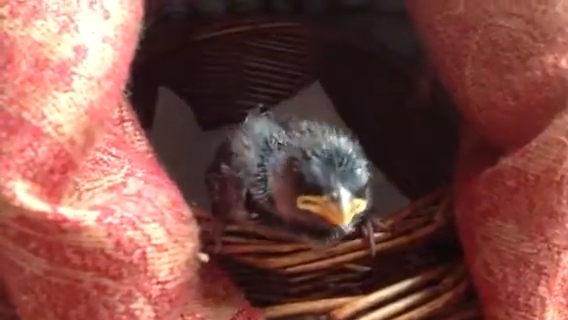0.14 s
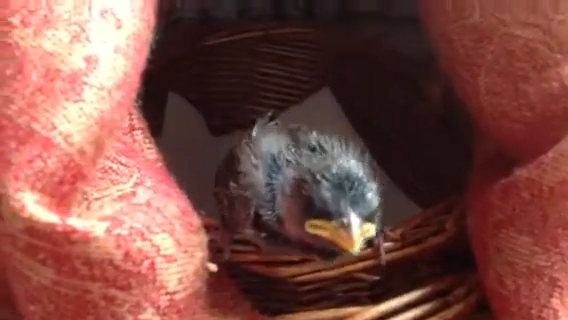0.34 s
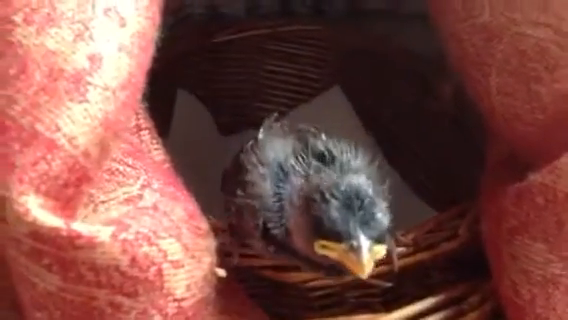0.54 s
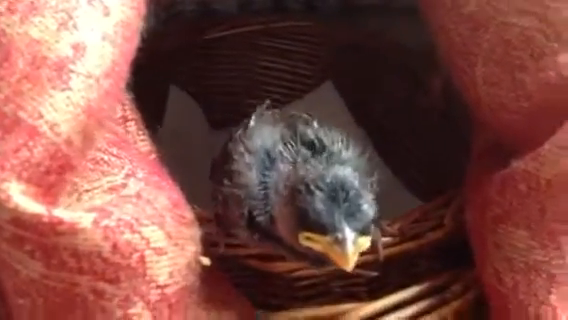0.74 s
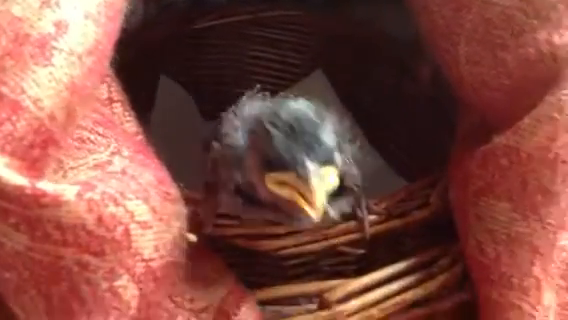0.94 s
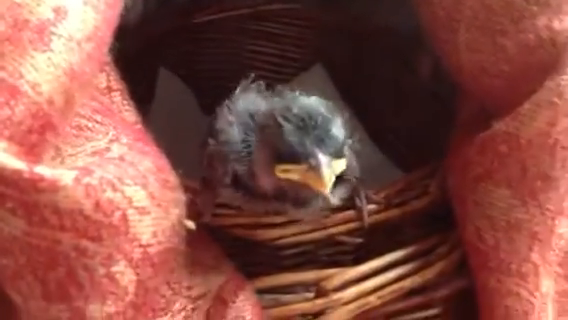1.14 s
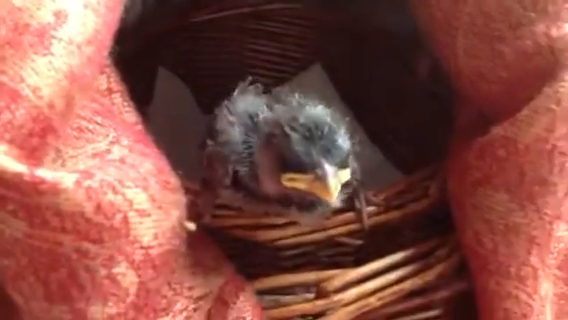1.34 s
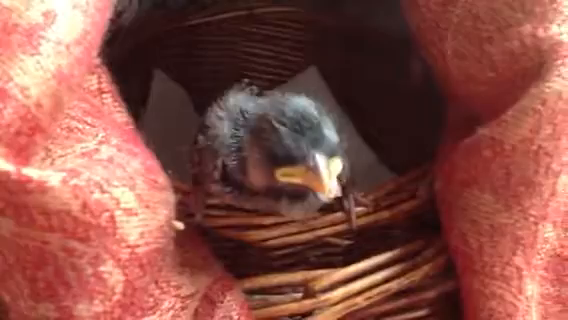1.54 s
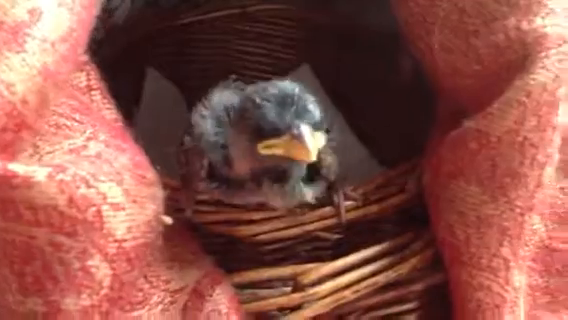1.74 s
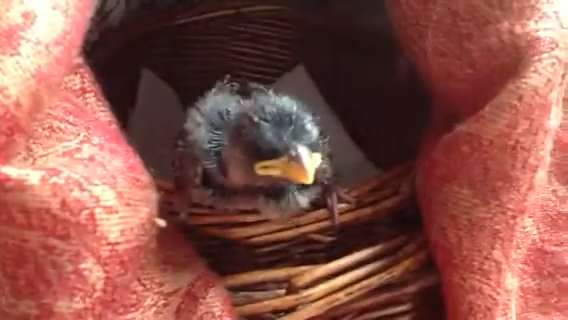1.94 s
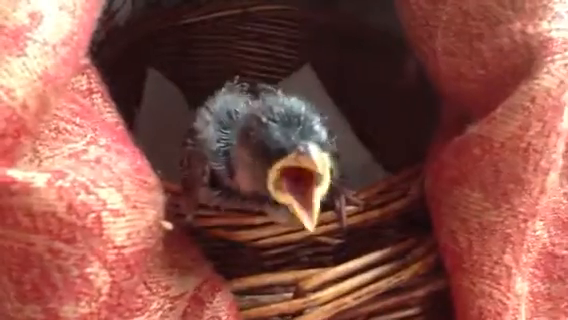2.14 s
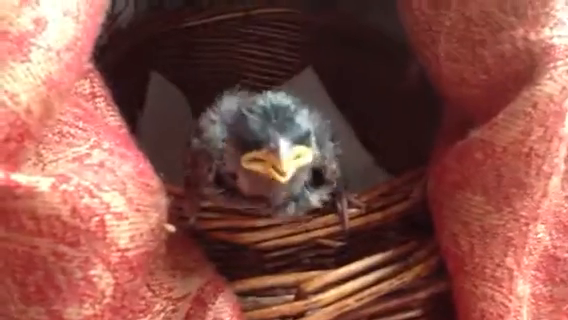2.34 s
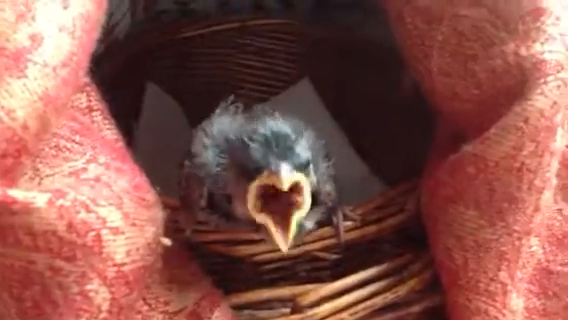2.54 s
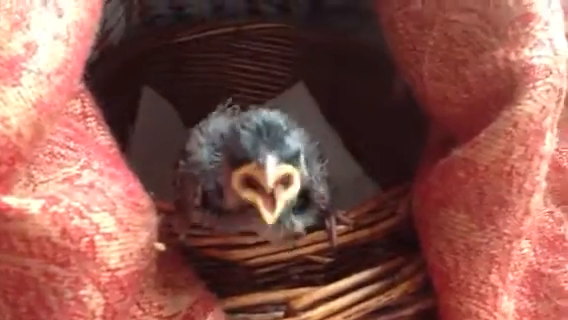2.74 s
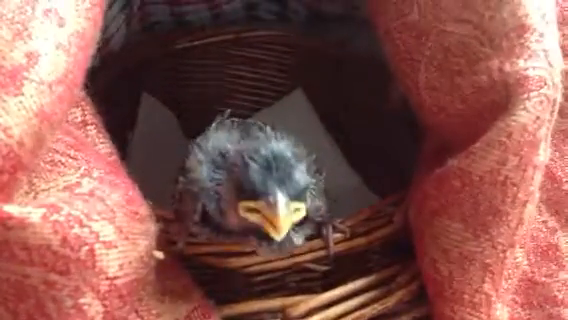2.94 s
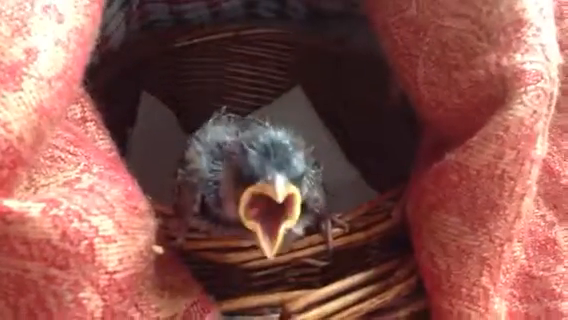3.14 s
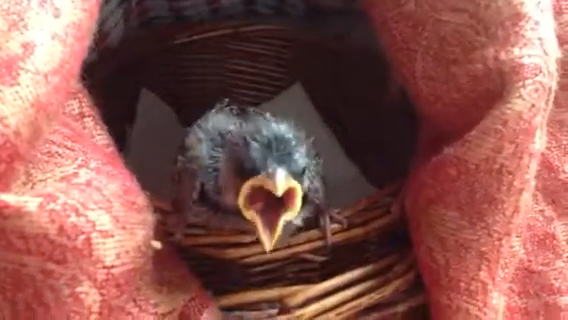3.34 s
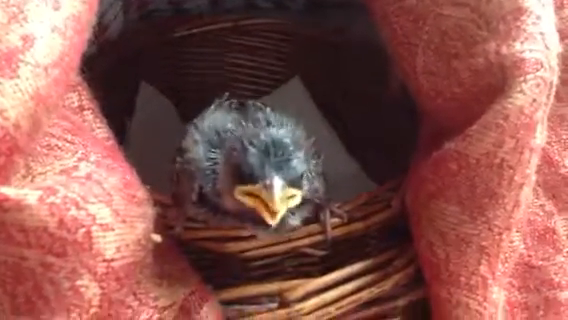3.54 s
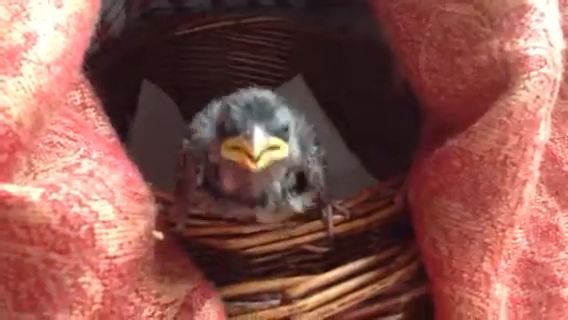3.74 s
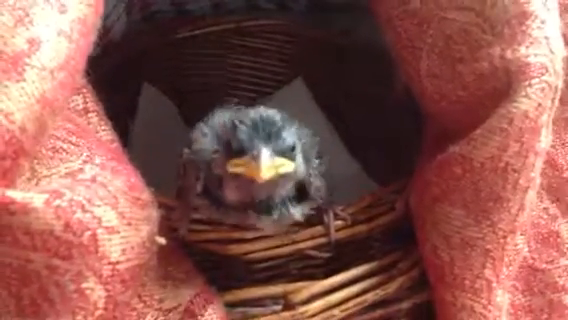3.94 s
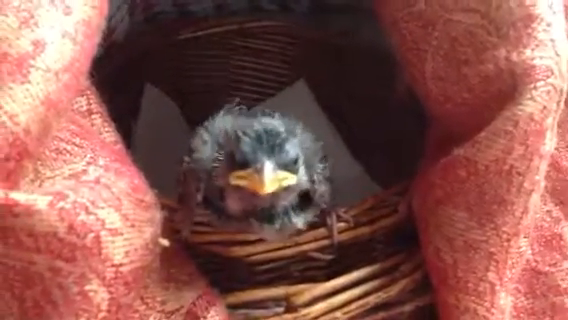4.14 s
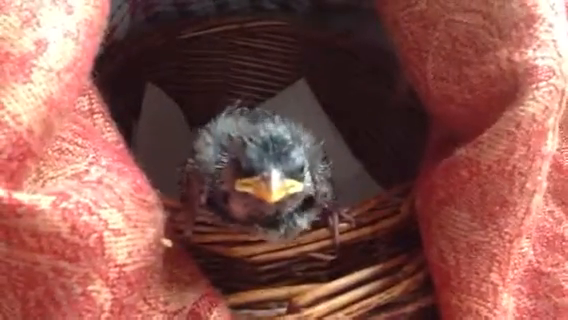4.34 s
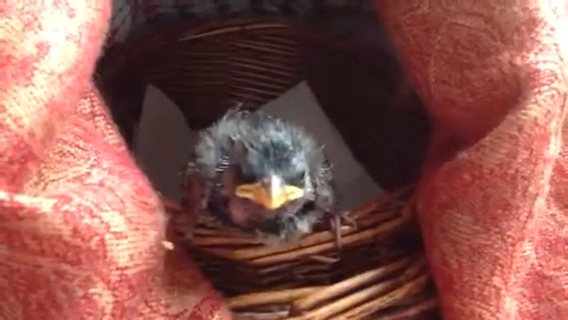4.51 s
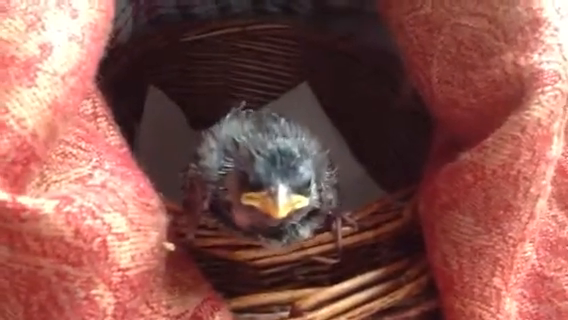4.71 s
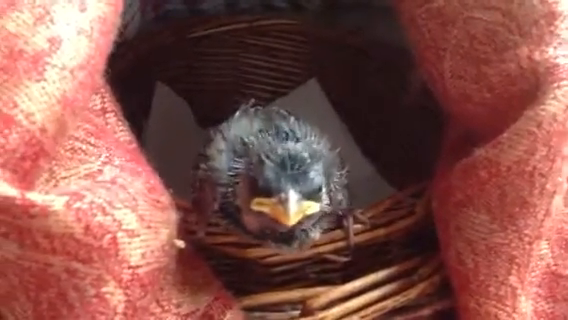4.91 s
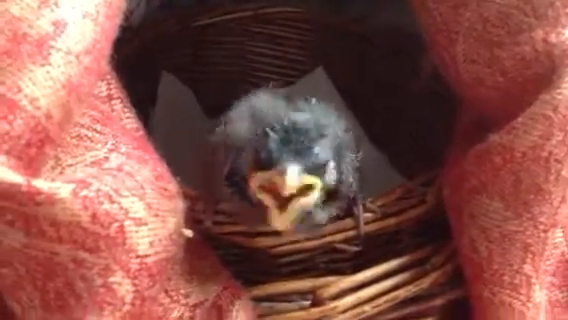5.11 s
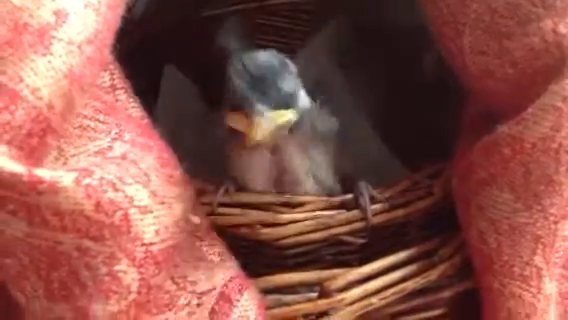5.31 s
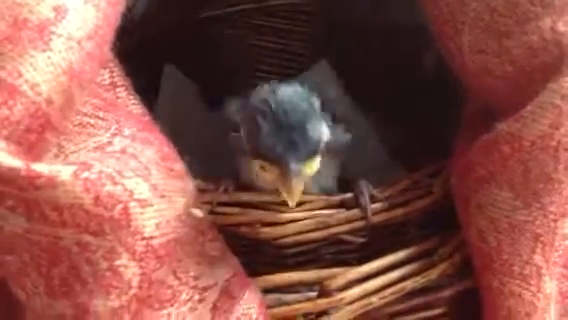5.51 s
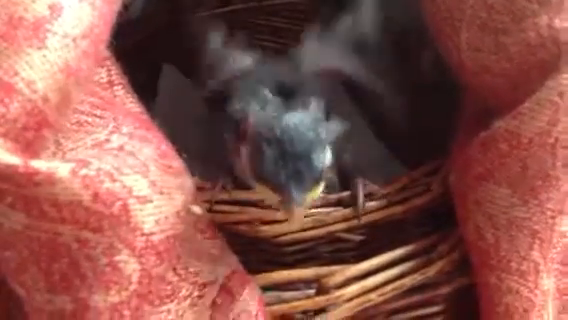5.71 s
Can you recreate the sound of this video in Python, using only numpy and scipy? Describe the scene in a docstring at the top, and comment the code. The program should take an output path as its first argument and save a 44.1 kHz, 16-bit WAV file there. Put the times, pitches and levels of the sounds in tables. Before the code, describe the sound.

A baby bird in a cloth-lined wicker basket begs close to the microphone with four piercing double chirps, roughly every one and a half seconds. Each begins as a rasp, rises to a clear whistle, dips and peaks again. Between them come tiny wicker ticks, dull soft knocks, and faint echoing chirps and thin whistles of birds far away. The small room adds a short tail and steady quiet hiss.

```python
"""Sparrow nestling begging in a basket

Close to the microphone, a nestling in a cloth-lined wicker basket begs with four double chirps.
Its voice flips between a clean whistle of a few partials and a chaotic rasp of uneven cycles and breath.
Far off, other birds give rough gliding chirps and thin whistles with reverberation.
The wicker ticks and dull knocks sound as dying noise bursts; cloth and walls return a short tail; the room hisses."""
import sys
import numpy as np
from scipy import signal
from scipy.fft import rfft, irfft
from scipy.io import wavfile

SR = 44100
rng = np.random.default_rng(int(sys.argv[2]) if len(sys.argv) > 2 else 0)


def bounce(signal):
    """Save signal as a 16-bit WAV file at the path given by the first command-line argument."""
    frames = np.transpose(np.atleast_2d(signal))
    limited = np.clip(frames, -1, 1)
    pcm = np.round(limited * 32767).astype(np.int16)
    wavfile.write(sys.argv[1], SR, pcm)


N = 258867  # length in samples

# The four chirps close to the microphone. Each row: start, held note begins, held note ends,
# second note tops, all in seconds.
CHIRP_TIMES = [(.9005, .993, 1.026, 1.130), (2.1855, 2.274, 2.297, 2.404), (3.690, 3.780, 3.815, 3.917),
               (5.402, 5.490, 5.522, 5.627)]
# Their pitches. Each row: step below the held note, held note middle, held note end,
# top of the second note, all in Hz.
CHIRP_PITCHES = [(4300, 5330, 5000, 4500), (4900, 5100, 5250, 4500), (4600, 5230, 5150, 4600),
                 (4550, 5365, 5230, 4500)]
# Their voices, against the shared shape. Each row: run-up whistle in dB, first note in dB, second note in dB,
# rasp in dB, opening rasp in dB, rasp under first note in dB, rasp under second note in dB,
# throat resonance early in the run-up in Hz, run-up treble in dB, treble in dB.
CHIRP_VOICES = [(5.5, 2, 3, 1, -1, -7, -14, 5750, 0, -.5), (-.5, .7, .5, .3, -5, -9, -8, 8300, 9.5, -.5),
                (-4, -.7, -.8, 1.5, 4.5, 7.5, 6, 6000, 0, -2),
                (-7.5, -2.2, -3.5, -1.8, -3, 5, 7.5, 5900, -2.5, 2)]
VOICE_EDGE_HZ = 970


def nestling():
    """A syrinx sounds a regular whistle and a chaotic rasp on one moving pitch."""
    out = np.zeros(N)
    for times, pitches, voice in zip(CHIRP_TIMES, CHIRP_PITCHES, CHIRP_VOICES):
        t, pitch, whistle_db, rasp_db, throat_hz, treble_db = chirp_controls(times, pitches, voice)
        clean = whistle(t, pitch, whistle_db, rasp_db)
        body, treble = rasp(pitch, throat_hz, jitter=0.066, noisy=1.3)
        fade = np.clip((t[-1] - t) / .014, 0, 1)
        add(out, t[0], fade * (clean + amp(rasp_db) * body + amp(treble_db) * treble))
    high_pass = signal.butter(2, VOICE_EDGE_HZ, "high", fs=SR, output="sos")
    return signal.sosfilt(high_pass, out + 1e-18)


# The shape that every chirp follows. Each row: seconds after its start, pitch in Hz, whistle in dB,
# rasp in dB, throat resonance in Hz, level of the rasp's treble in dB.
CHIRP_SHAPE = [(0, 2800, -85, -61, 5600, -79), (.0015, 2880, -74, -36, 5770, -62),
               (.014, 3000, -68, -37.5, 5850, -48), (.027, 3150, -62, -29.5, 5900, -39),
               (.052, 3450, -45, -18.5, 6200, -31), (.071, 4130, -20, -19, 6000, -25),
               (.083, 4550, -14, -24, 5400, -22), (.091, 5255, -10, -32, 4740, -32),
               (.102, 5260, -7.5, -32.5, 4700, -33), (.121, 5160, -8.5, -35, 4800, -32),
               (.135, 4050, -13, -22.5, 5300, -25.5), (.144, 3300, -45, -18, 5300, -33),
               (.179, 2420, -36, -24, 4470, -39.5), (.196, 3000, -25, -20.5, 5250, -35),
               (.210, 3725, -15, -29, 4490, -33), (.226, 4510, -13, -24.5, 4500, -41),
               (.238, 4280, -19, -23, 4350, -32.5), (.252, 3300, -32, -27.5, 4130, -44),
               (.282, 2780, -82, -38, 3500, -57)]
GAPE_KEPT = .55  # share of the gape left as the whistle sets in


def chirp_controls(times, pitches, voice):
    """Stretch the shared shape to one chirp's turning points and bend it to its pitches and voice."""
    at, shape_hz, *levels = np.transpose(CHIRP_SHAPE)
    _, _, _, swell, loud, voiced, step, held, middle, released, *second_half = at
    falling, fallen, trough, rising, climb, top, tipped, _, end = second_half
    t = np.arange(times[0], times[-1] + end - top, 1 / SR)
    u = np.interp(t, [*times, t[-1]], [0, held, released, top, end])  # time on the shape
    whistle_db, rasp_db, throat_hz, treble_db = [np.interp(u, at, level) for level in levels]

    shifts = np.array(pitches) - np.interp([step, middle, released, top], at, shape_hz)
    step_hz, middle_hz, released_hz, top_hz = shifts
    pitch = np.interp(u, at, shape_hz) + np.interp(
        u, [swell, step, held, middle, released, fallen, trough, top, end],
        [0, step_hz, 0, middle_hz, released_hz, 0, 0, top_hz, 0])

    runup_db, first_db, second_db, rough_db, opening_db, *rest = voice
    under_first_db, under_second_db, runup_hz, bright_db, airy_db = rest
    rasp_db = rasp_db + rough_db + np.interp(
        u, [0, swell, loud, step, held, released, falling, rising, climb, top],
        [0, opening_db, 0, 0, under_first_db, under_first_db, 0, 0, under_second_db, 0])
    whistle_db = whistle_db + np.interp(
        u, [step, held, fallen, trough, top, tipped],
        [runup_db, first_db, first_db, second_db, second_db, 0])

    # the beak gapes most early in the run-up, which moves the throat resonance and the treble
    gape = np.interp(u, [0, swell, voiced, held], [0, 1, GAPE_KEPT, 0])
    throat_hz = throat_hz + gape * (runup_hz - np.interp(swell, at, levels[2]))
    return t, pitch, whistle_db, rasp_db, throat_hz, treble_db + airy_db + gape * bright_db


# Moments when the whistle nearly breaks off. Each row: time in seconds, half width in ms.
BREAKS = [(0.988, 0.64), (1.03, 1.05), (1.133, 1), (1.141, 1), (2.29, 0.51), (2.299, 1), (2.402, 1.19),
          (2.41, 0.33), (2.413, 0.33), (2.419, 0.49), (3.802, 0.54), (5.527, 0.33), (5.531, 0.5),
          (5.622, 0.67)]
# Partials of the whistle; half multiples come from strong-weak cycles.
# Each row: multiple of the pitch, level in dB against the whistle.
PARTIALS = [(.5, -32.5), (1, -0.5), (1.5, -38), (2, -24.5), (2.5, -31), (3, -24)]
STRONG_WEAK_HZ, WHISTLE_EDGE_HZ = 4900, 2960  # half multiples sound only above the first


def whistle(t, pitch, whistle_db, rasp_db):
    """Regular syrinx: flickering partials of one pitch, heard through a throat that passes lows poorly."""
    shaken = np.clip(amp(rasp_db - whistle_db), 0, 1)  # a strong rasp unsteadies the whistle
    unsteady = 1 + (.005 + .035 * shaken) * wander(len(t), 500)
    turn = 2 * np.pi * np.cumsum(pitch * unsteady) / SR
    doubled = np.clip((pitch - STRONG_WEAK_HZ) / 200, 0, 1)
    tone = 0
    for k, db in PARTIALS:
        flicker_db = .6 if k == 1 else 3.0
        share = doubled if k % 1 else 1
        level = share * amp(db + flicker_db * wander(len(t), 260))
        tone = tone + level * np.sin(k * turn) * np.sqrt(2)
    for at, ms in BREAKS:
        tone = tone * (1 - .85 * np.exp(-((t - at) * 1000 / ms) ** 2))
    # the clean cycle fades away as the rasp grows from 2 to 8 dB above it
    tone = tone * np.clip((whistle_db - rasp_db + 8) / 6, 0, 1)
    high_pass = signal.butter(7, WHISTLE_EDGE_HZ, "high", fs=SR, output="sos")
    return signal.sosfilt(high_pass, tone * amp(whistle_db))


# Colour of the rasp beside the throat resonance. Each row: frequency in Hz, relative level in dB.
SKIRT = [(300, -55), (1000, -28), (1600, -16.5), (2300, -11.5), (3000, -2.5), (4200, 7), (5500, 4),
         (8000, -21), (16000, -32.5)]
THROAT_WIDTH_HZ, SIDE_DB, TREBLE_EDGE_HZ = 1200, -2.5, 8800
THIN_FROM_HZ, THIN_DB_PER_KHZ = 3200, -3.5  # turbulence thins over the first kilohertz above this pitch


def rasp(pitch, throat_hz, jitter, noisy):
    """Chaotic syrinx: cycles of uneven length and size, heard through the throat; returns body and treble."""
    n = len(pitch)
    chaos = 1 - np.exp(-(np.arange(n) / SR / 0.015) ** 2)  # a thin squeak first, which then breaks up
    uneven = 1 + jitter * (.3 + 0.89 * chaos) * wander(n, 1100)
    turn = 2 * np.pi * np.cumsum(pitch * uneven) / SR
    # the squeak runs at twice the pitch; odd multiples enter as the cycles pair up
    source = 0
    for k in range(1, 7):
        share = chaos if k % 2 else 1
        source = source + np.cos(k * turn) * share * (k * pitch < .45 * SR)
    bursts = amp(3.5 * np.tanh(wander(n, 500)))
    cycles = rms_one(source) * bursts
    breath = chaos * rng.standard_normal(n)
    source = cycles + noisy * breath

    # moving resonance: shift its centre to zero, low-pass, shift back
    centre = np.exp(2j * np.pi * np.cumsum(throat_hz) / SR)
    narrow = signal.butter(2, THROAT_WIDTH_HZ / 2, fs=SR, output="sos")
    peak = (signal.sosfilt(narrow, source / centre) * centre).real

    # turbulence fills in beside the resonance and below the pitch
    skirt = colour(source + 4.04 * bursts * rng.standard_normal(n), SKIRT)
    side_db = SIDE_DB + THIN_DB_PER_KHZ * np.clip((pitch - THIN_FROM_HZ) / 1000, 0, 1)
    body = rms_one(rms_one(peak) + amp(side_db) * chaos * rms_one(skirt))
    high_pass = signal.butter(3, TREBLE_EDGE_HZ, "high", fs=SR, output="sos")
    treble = signal.sosfilt(high_pass, cycles + .75 * breath)
    return body, rms_one(treble)


# What the cloth and walls around the basket send back. Each row: frequency in Hz, relative level in dB.
WALLS = [(1500, -20.5), (2500, 10.5), (3300, 1), (4500, -2.5), (5600, -4.5), (9000, -6.5), (16000, -9)]
ROOM_T60_S, ROOM_DB = .31, -21.5


def room_tail(chick):
    """Cloth and walls colour the voice and scatter it into a diffuse decay."""
    return amp(ROOM_DB) * echoes(colour(chick, WALLS), ROOM_T60_S)


# Ticks of wicker and feathers. Each row: time in seconds, peak in dB.
TICKS = [(.737, -55), (2.154, -52), (2.181, -45), (2.571, -57), (3.156, -54), (3.166, -60), (5.253, -41.5),
         (5.262, -41), (5.304, -50), (5.324, -48), (5.354, -48), (5.360, -50), (5.760, -52)]


def ticks():
    """Wicker and feathers give bright noise bursts that die at once."""
    return contacts(TICKS, hz=8800, t60=.025)


# Dull knocks. Each row: time in seconds, peak in dB.
KNOCKS = [(2.695, -58), (2.711, -51), (4.062, -57), (4.075, -60), (4.084, -59), (5.352, -57), (5.43, -51),
          (5.445, -52)]


def knocks():
    """Dull knocks are lower noise bursts that die a little more slowly."""
    return contacts(KNOCKS, hz=760, t60=.055)


def contacts(rows, hz, t60):
    """Short dying noise bursts, nearly two octaves wide around hz."""
    out, t = np.zeros(N), np.arange(SR // 10) / SR
    band = signal.butter(2, [hz / 2.3, min(hz * 1.6, .45 * SR)], "band", fs=SR, output="sos")
    for s, db in rows:
        burst = signal.sosfilt(band, rng.standard_normal(len(t)) * amp(-60 * t / t60))
        add(out, s, amp(db) * burst / np.abs(burst).max())
    return out


# When sparrows chirp far off. Each row: start in seconds, relative level in dB, semitones up.
FAR_CHIRPS = [(-.055, -56.5, .3), (.61, -72.5, 1), (2.0, -69.5, -.3), (3.19, -58.5, .1), (4.138, -56, .4),
              (4.888, -58, .1), (5.075, -67, -.5), (5.782, -60.5, .7)]
# The three rough notes of a far chirp. Each row: seconds after its start, length in seconds,
# first pitch in Hz, last pitch in Hz (both before the semitones), relative level in dB.
FAR_NOTES = [(0, .05, 3750, 3900, -2), (.024, .035, 4500, 4600, -5), (.03, .088, 3450, 2550, -1)]
FAR_T60_S = .32
FAR_FALL_BEND = 1.8  # a note lingers near its first pitch before it slides (1 = straight)


def far_chirps():
    """Rough gliding notes arrive more as reverberation than directly."""
    out = np.zeros(N)
    for s, chirp_db, semitones in FAR_CHIRPS:
        chirp = np.zeros(SR // 2)
        for after, length, first_hz, last_hz, db in FAR_NOTES:
            u = np.linspace(0, 1, int(length * SR))
            glide = first_hz + (last_hz - first_hz) * u ** FAR_FALL_BEND
            roughness = 1 + .038 * wander(len(u), 300)
            hz = glide * 2 ** (semitones / 12) * roughness
            swell = np.sin(np.pi * u) ** 0.55
            add(chirp, after, 2 * amp(chirp_db + db) * swell * np.sin(2 * np.pi * np.cumsum(hz) / SR))
        add(out, s, .6 * chirp + .9 * echoes(chirp, FAR_T60_S))
    return out


# Thin whistles far off. Each row: start in seconds, length in seconds, first pitch in Hz,
# middle pitch in Hz, last pitch in Hz, approximate mean level in dB.
FAR_WHISTLES = [(.015, .024, 7500, 7450, 7400, -75), (.135, .03, 7550, 7500, 7500, -77),
                (.29, .04, 7000, 6800, 6700, -77), (1.371, .33, 1880, 1890, 2020, -83),
                (2.705, .02, 6000, 6600, 6900, -68), (2.857, .02, 6300, 6300, 6370, -75.5),
                (2.945, .025, 5250, 5150, 5110, -68), (4.249, .021, 5200, 5900, 6900, -70),
                (4.346, .022, 5000, 6650, 6300, -72), (4.444, .047, 6700, 5890, 6540, -71),
                (4.463, .018, 4100, 5000, 4560, -65), (4.558, .035, 6400, 5970, 6670, -71),
                (4.576, .023, 4500, 4970, 4590, -64), (4.698, .04, 5300, 5960, 5170, -77.5),
                (4.71, .029, 4000, 4400, 4200, -71.5), (4.729, .021, 3600, 3910, 3710, -69),
                (5.014, .017, 4750, 4740, 4900, -69), (5.19, .014, 4100, 4250, 4350, -72),
                (5.262, .02, 4200, 4600, 4900, -70)]


def far_whistles():
    """Thin pure tones on curved glides arrive more directly, with a weaker reverberation."""
    whistles = np.zeros(N)
    for s, length, first_hz, middle_hz, last_hz, db in FAR_WHISTLES:
        u = np.linspace(0, 1, int(length * SR))
        curve = np.polyfit([0, .5, 1], [first_hz, middle_hz, last_hz], 2)
        hz = np.polyval(curve, u)
        swell = np.sin(np.pi * u) ** 0.23
        add(whistles, s, 2 * amp(db) * swell * np.sin(2 * np.pi * np.cumsum(hz) / SR))
    return whistles + echoes(.5 * whistles, FAR_T60_S)


# Colour of the room's steady hiss. Each row: frequency in Hz, relative level in dB per Hz.
HISS = [(30, -45.5), (80, -22.5), (130, -7.5), (220, -4), (330, -10), (500, -12.5), (1000, -15.5),
        (2200, -17.5), (6000, -19), (15500, -22.5)]
HISS_DB = -65.5  # rms


def room_hiss():
    """Steady random noise, strongest in the lows."""
    return amp(HISS_DB) * rms_one(colour(rng.standard_normal(N), HISS))


def amp(db):
    """Decibels to gain."""
    return 10 ** (np.asarray(db) / 20)


def rms_one(x):
    """Scale to unit rms."""
    return x / np.sqrt(np.mean(x ** 2) + 1e-20)


def wander(n, hz):
    """Low-passed noise of unit rms."""
    low_pass = signal.butter(2, hz, fs=SR, output="sos")
    return rms_one(signal.sosfilt(low_pass, rng.standard_normal(n)))


def colour(x, spectrum):
    """Filter x by the curve (Hz, dB), joined on a log axis."""
    hz, db = np.transpose(spectrum)
    bins = np.maximum(np.fft.rfftfreq(len(x), 1 / SR), 1)
    return irfft(rfft(x) * amp(np.interp(np.log(bins), np.log(hz), db)), len(x))


def add(out, s, x):
    """Mix x into out from time s in seconds, cut to fit."""
    i = round(s * SR)
    x = x[max(-i, 0):N - i]
    out[max(i, 0):max(i, 0) + len(x)] += x


def echoes(x, t60):
    """Diffuse reflections: soft-starting, decaying noise of unit energy."""
    t = np.arange(SR // 2) / SR
    tail = rng.standard_normal(len(t)) * amp(-60 * t / t60) * (1 - np.exp(-t / 0.012))
    return signal.fftconvolve(x, tail / np.sqrt(np.sum(tail ** 2)))[:len(x)]


def scene():
    """Nestling with its room tail, small contacts, far birds and steady hiss."""
    chick = nestling()
    near = chick + room_tail(chick) + ticks() + knocks()
    far = far_chirps() + far_whistles()
    return (near + far + room_hiss())[None]


CUTOFF_HZ = 15750  # 90 dB down from here up


def record(dry):
    """The microphone squeezes the loudest positive peaks, leaving a faint low thump; the top is cut steeply."""
    dry = dry - .8 * np.maximum(dry - .58, 0) ** 2
    return signal.sosfilt(signal.cheby2(26, 90, CUTOFF_HZ, fs=SR, output="sos"), dry)


dry = scene()
out = record(dry)
bounce(out)
```